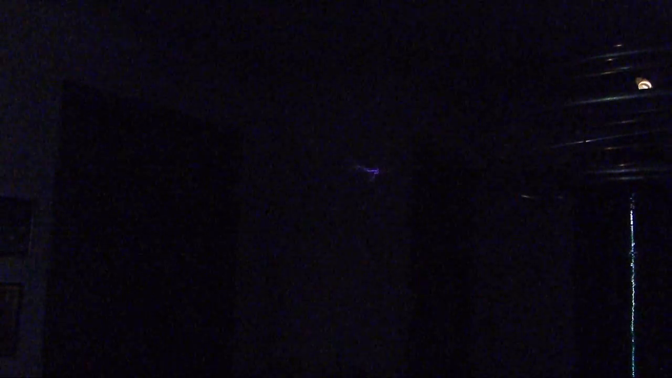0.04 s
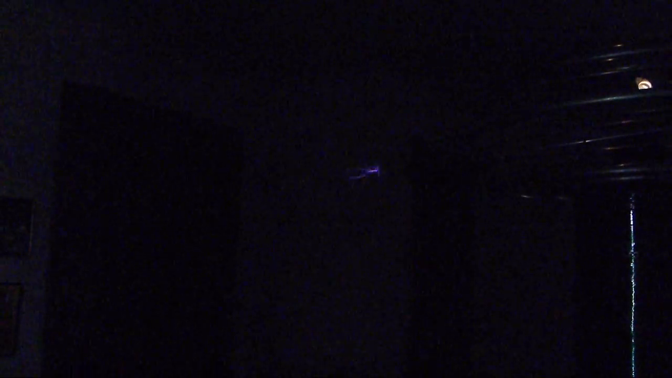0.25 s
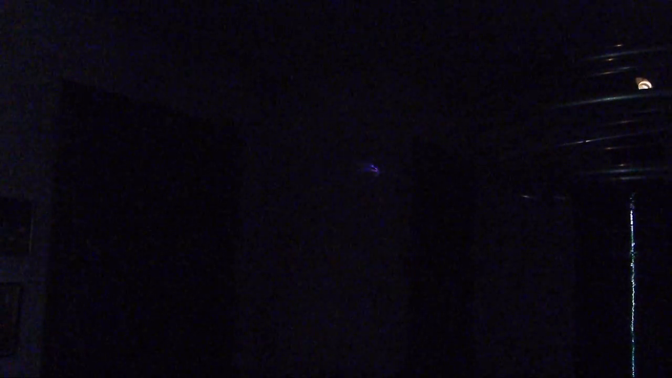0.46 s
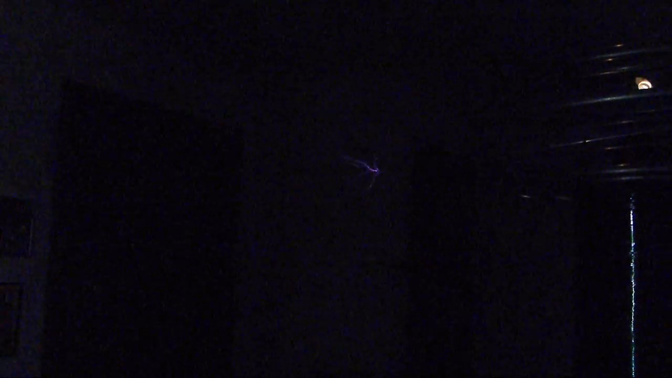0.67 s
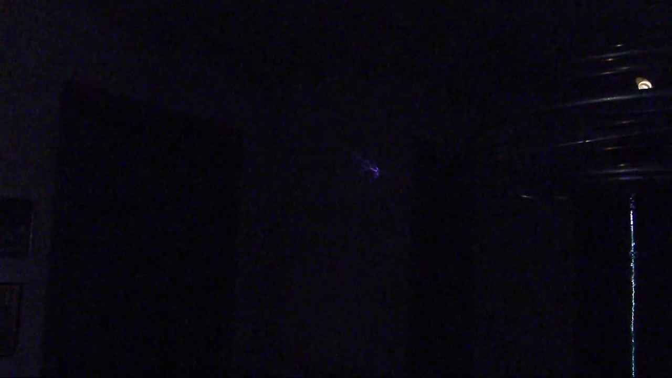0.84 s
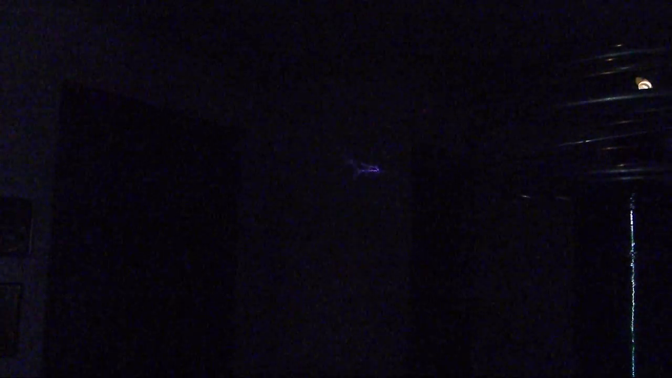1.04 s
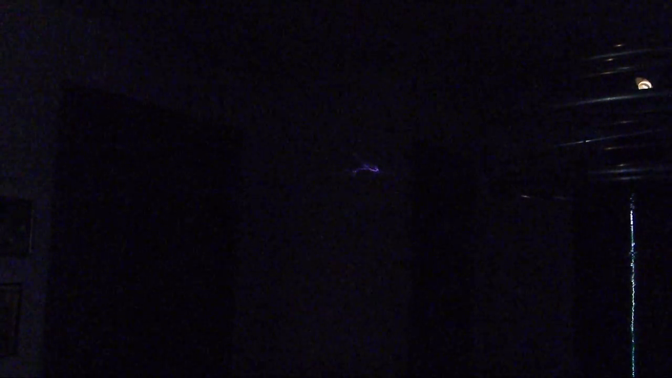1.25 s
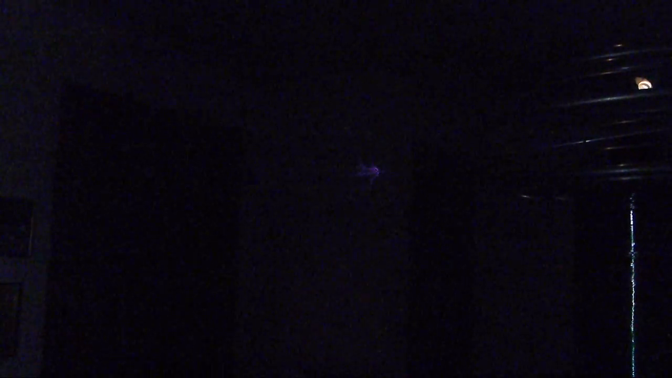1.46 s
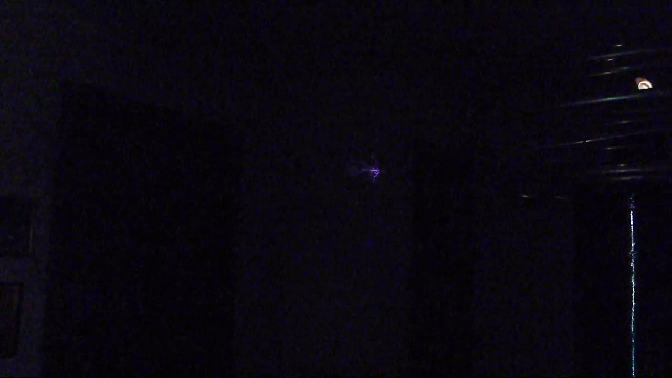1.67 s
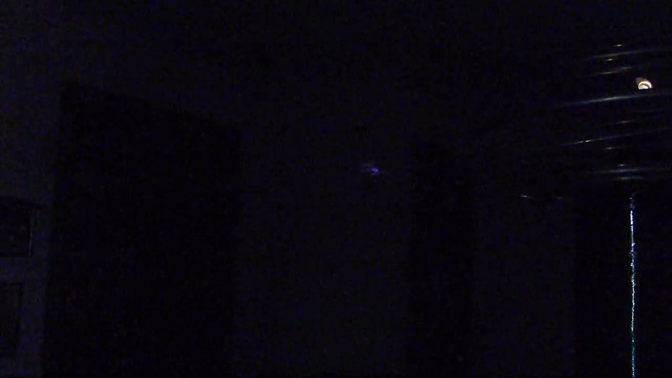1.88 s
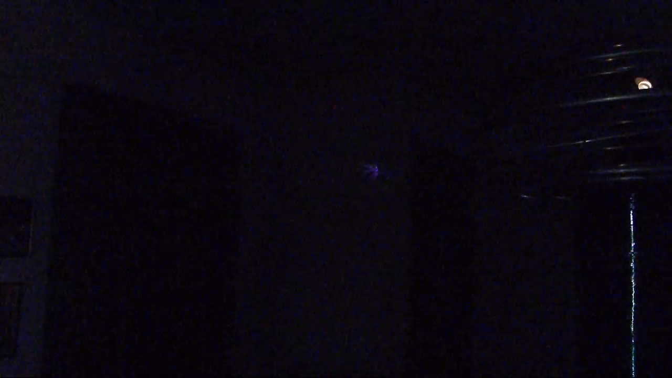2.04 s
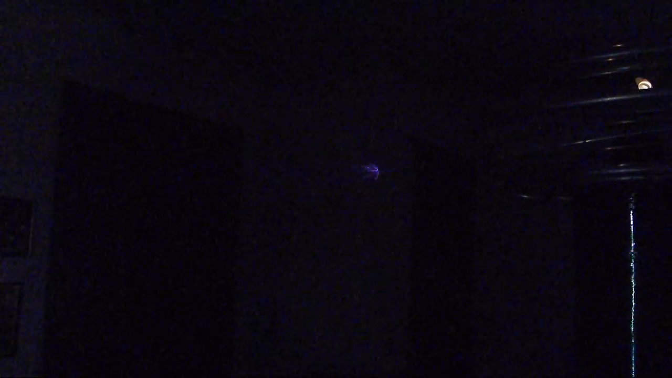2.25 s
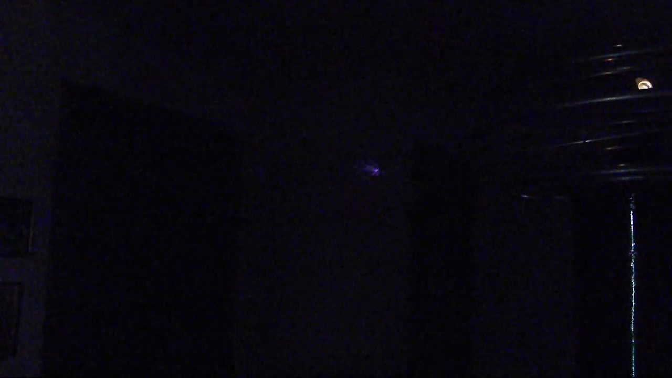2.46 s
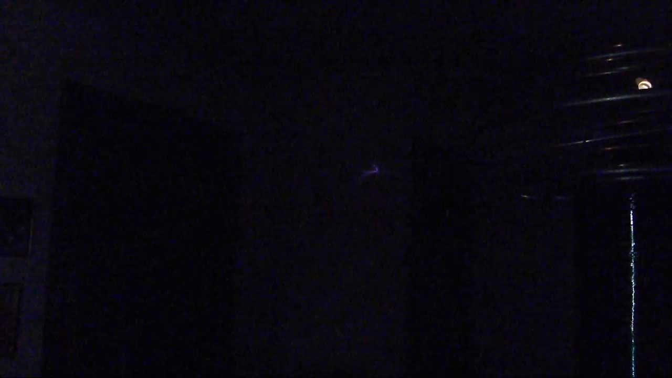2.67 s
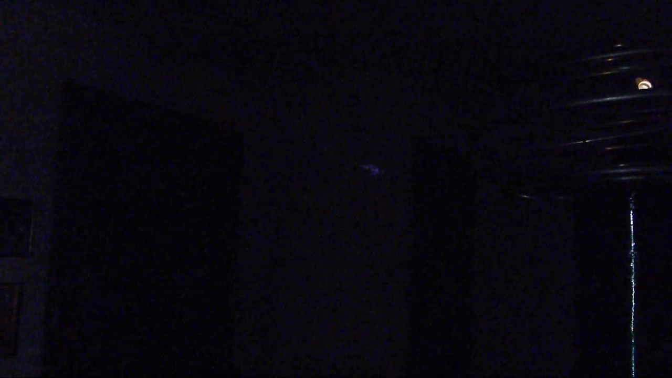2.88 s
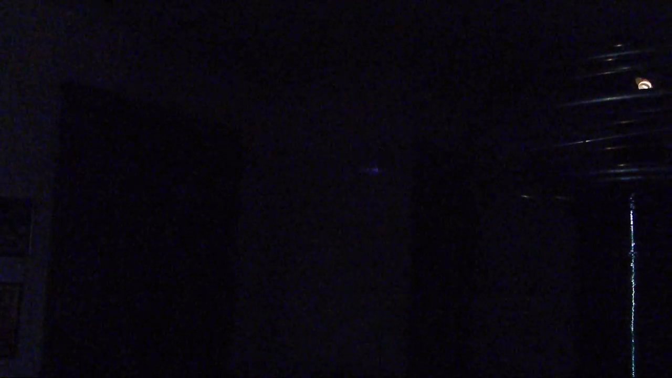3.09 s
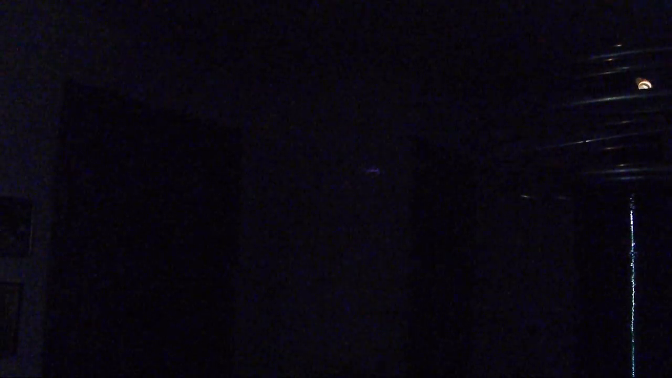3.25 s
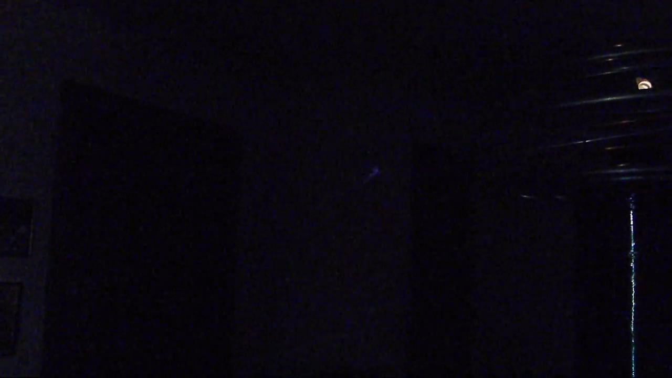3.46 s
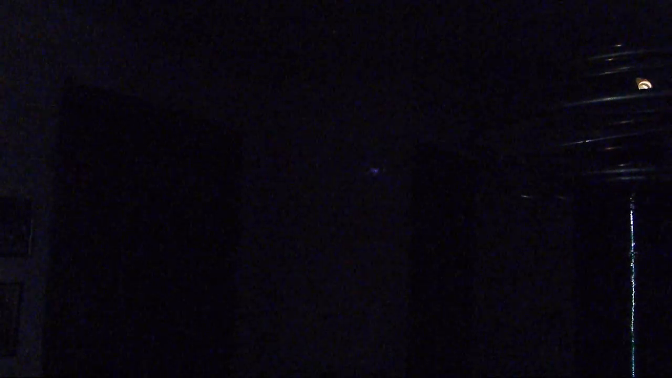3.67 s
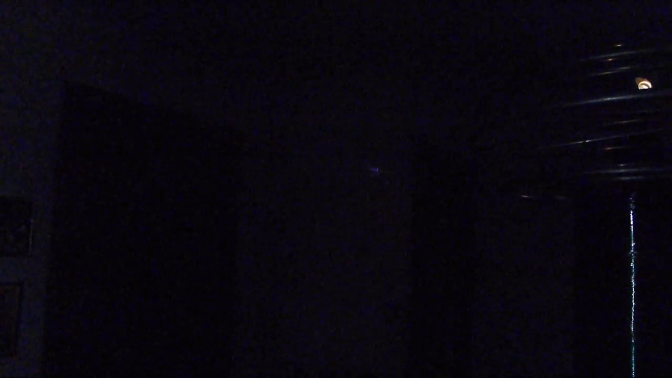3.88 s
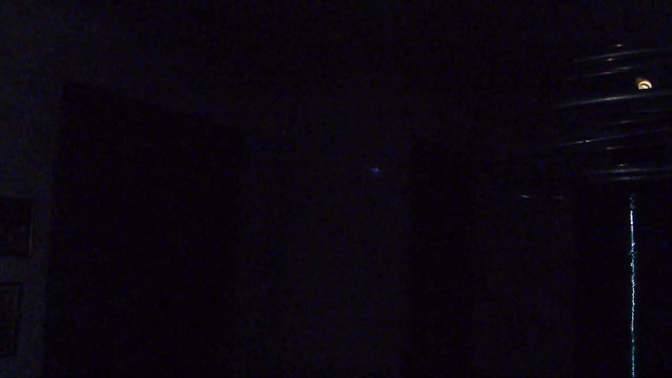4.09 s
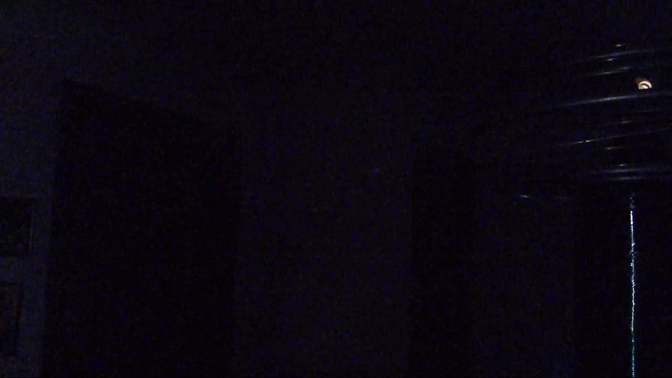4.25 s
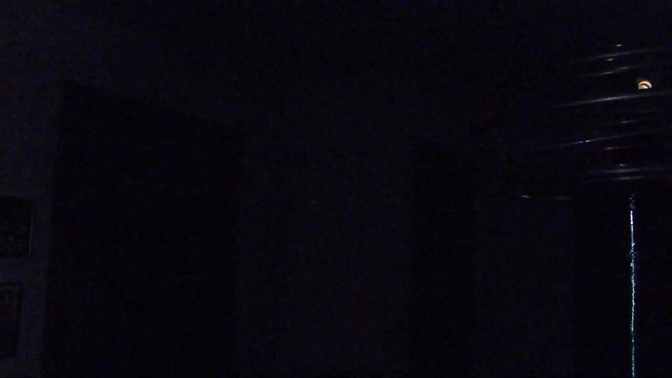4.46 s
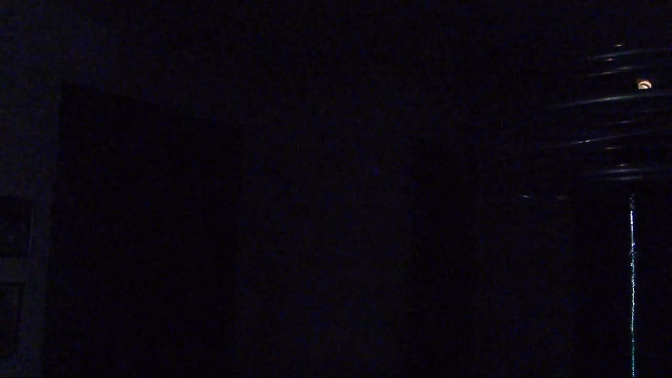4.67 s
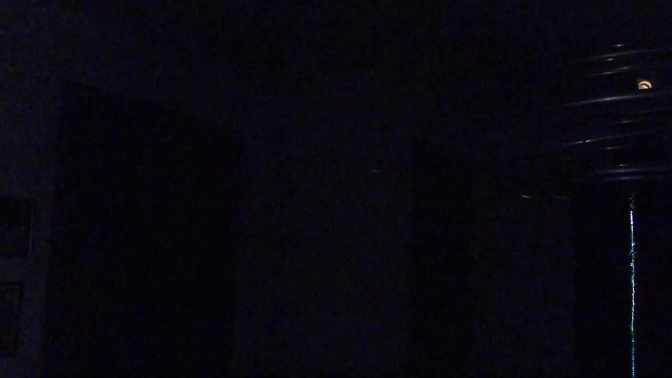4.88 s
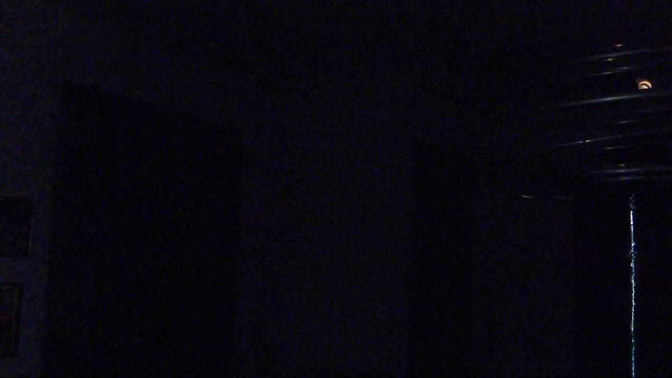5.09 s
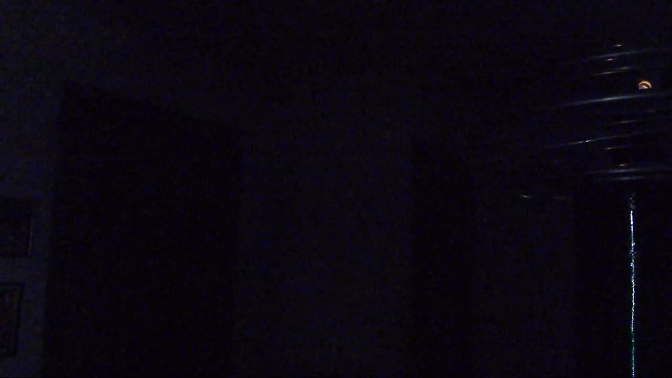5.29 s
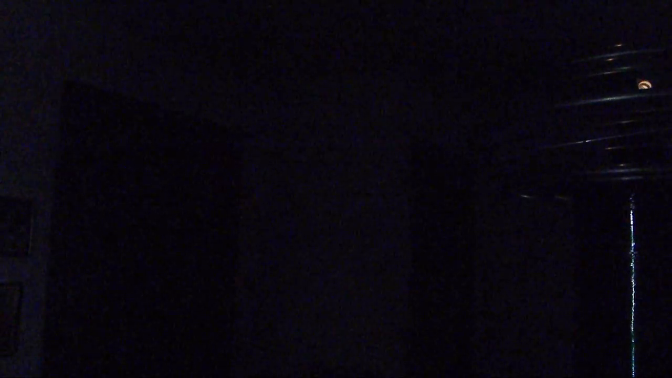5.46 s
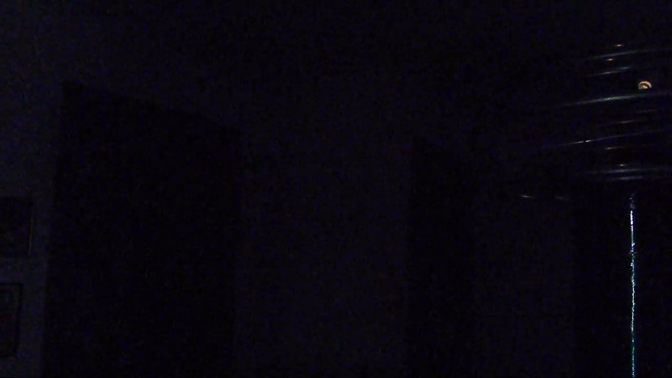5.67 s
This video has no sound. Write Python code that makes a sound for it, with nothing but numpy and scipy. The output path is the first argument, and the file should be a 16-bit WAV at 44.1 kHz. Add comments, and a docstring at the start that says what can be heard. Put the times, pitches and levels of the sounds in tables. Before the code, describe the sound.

From the start, a high-voltage coil fires sparks into the air of a small room, so rapidly that they merge into a harsh, raspy buzz of unchanging pitch. Crackle and a high fizz ride on it, with short wall reflections and slightly sharper cracks at about 0.4, 1.1, 2.1 and 2.7 seconds. Near 2.8 seconds the buzz becomes quieter and thinner. It swells back a little around 3.6 to 3.8 seconds with two more cracks, then falls away sharply just after 4 seconds. From about 5 seconds the dying arc only sputters, giving a string of weak, irregular spits until the end at roughly 5.7 seconds. As the arc fades, the spark gap's thin, rapid ticking and the coil's faint, very high whistle come forward, along with a low room hush carrying a slight electrical hum.

```python
"""A harsh, crackling buzz: a high-voltage coil throws about 69 sparks a second into a small room.
Each discharge heats the air into a bang whose exact repetition makes the buzz; branching streamers add
a crack and the corona a fizz, both new every time, and the spark gap a thin tick. The arc shrinks in
two steps until it only spits now and then, while the tick, the coil's resonant whistle and the
room's hush come forward."""
import sys
import numpy as np
from scipy import signal
from scipy.fft import rfft, irfft
from scipy.io import wavfile

SR = 44100
rng = np.random.default_rng(int(sys.argv[2]) if len(sys.argv) > 2 else 0)


def wrap_up_sound(samples):
    """Save the sound to the file named by the first command line argument, as 16-bit audio."""
    columns = np.atleast_2d(samples).T
    # keep every value between -1 and 1, then stretch to whole-number steps
    tamed = np.clip(columns, -1, 1)
    steps = np.round(tamed * 32767).astype(np.int16)
    wavfile.write(sys.argv[1], SR, steps)


N = 252693

FIRING_HZ, FIRST_FIRING_S = 68.65, .0114
CUTOFF_HZ = 15790
# sound paths, direct and by ceiling and walls: delay/ms, level/dB, extra treble level/dB
PATHS = [(0, 0, 0), (1.68, 0, 2), (2.07, -8, -8), (4.0, -4, -9), (5.64, -7, -10), (6.55, -2, -10),
         (9.58, -2, -8)]


def arc_bang(times, level_db, size_db, treble_db):
    """A shorter pulse has a wider spectrum: the repeating bang sharpens as the arc shrinks."""
    # spectrum of the bang's sharp edge: f/Hz, relative level/dB
    edge_spectrum = [(3850, 1), (4500, 5), (5200, -1), (5900, -20), (7500, -25), (11500, 1.5), (13000, -2),
                     (16000, -22)]
    sharp_db = np.minimum(treble_db - 0.41 * size_db, 6.5)
    sharp_db = np.interp(np.arange(N) / SR, times, sharp_db)
    drone = buzz(centre_hz=2010, diffuse_db=-1)
    drone = brightened(drone, 0.81 * sharp_db, edge_hz=3440)
    drone = from_db(7.5) * brightened(drone, 0.49 * sharp_db, edge_hz=1260)
    edge = from_db(sharp_db - 9) * click_train(edge_spectrum, lead_ms=0, diffuse_db=5)
    return held(times, level_db) * (drone + edge)


def buzz(centre_hz, diffuse_db):
    """Thermal expansion: the channel gives the same push and pull at each firing; walls repeat it."""
    # harmonics, some favoured by the room's standing waves: multiple of the firing rate, level/dB
    harmonics = [(1, -35), (2, -34), (3, -36), (4, -20), (5, -15), (6, -25), (7, -10), (8, -17), (9, -21),
                 (10, -10), (11, -13), (12, -16), (13, -8), (14, -17), (15, -13), (16, -11), (17, -18),
                 (18, -3), (19, -9), (20, -10), (21, -15), (22, -15), (23, -11), (24, -6), (25, -14),
                 (26, -6), (27, -5), (28, -7), (29, 0), (30, -9), (31, -16), (32, -12), (33, -6), (34, -19),
                 (35, -1), (36, -4), (37, -5), (38, -11), (39, -8), (40, -8), (41, -12), (42, -16),
                 (43, -14), (44, -7), (45, -9), (46, -12), (47, -17), (48, -15), (49, -15), (50, -18),
                 (51, -13), (52, -11), (53, -14), (54, -20), (55, -16), (56, -23)]
    multiples, db = np.transpose(harmonics)
    hz = multiples * FIRING_HZ
    s = 1j * hz / centre_hz
    pulse = s ** 2 / (1 + s + s ** 2) / (1 + s)
    arriving = pulse * path_sum(hz, 0, diffuse_db)
    return repeating(multiples, from_db(db) * arriving / np.abs(arriving))   # arrival sets phase only


def streamers(times, level_db, bright_db):
    """Random branching: new streamers at each firing give a broadband crack."""
    # spectrum of the crack: f/Hz, relative level/dB
    spectrum = [(100, -21), (500, -19), (1000, -10), (1700, -4.5), (2500, 3.5), (3500, 2), (4500, -0.5),
                (6000, -3.5), (9000, -8.5), (16000, -61)]
    bursts = crackle(times, level_db, length_s=.00018, treble_share=.3, diffuse_db=1.2, wander_s=.00006)
    lift_db = np.interp(np.arange(N) / SR, times, bright_db)
    return brightened(without_lead_in(coloured(bursts, spectrum)), lift_db, edge_hz=3500)


def corona(times, level_db):
    """Corona discharge at the tips: shorter, drier bursts that fizz high in the treble."""
    # spectrum of the fizz: f/Hz, relative level/dB
    spectrum = [(1000, -34), (5000, -35), (7000, -10.5), (9000, -6), (11000, -0.5), (12500, 2.5),
                (14000, 0.5), (16000, -6.5)]
    bursts = crackle(times, level_db, length_s=.00009, treble_share=1, diffuse_db=-5.5, wander_s=.00005)
    return without_lead_in(coloured(bursts, spectrum))


def spark_gap(times, size_db, lead_ms=1.9):
    """Electrical breakdown: the gap fires just ahead of the arc, a tick with a little sizzle."""
    # spectrum of tick and sizzle: f/Hz, relative level/dB
    spectrum = [(4000, -17), (6000, -14), (7200, -2.5), (8800, -0.5), (9300, -0.5), (9700, -3), (11300, 0),
                (13000, -3.5), (16000, -16.5)]
    times = times - lead_ms / 1000
    chance = clipped_normal(len(times))
    sizzle_db = 2.5 + 0.84 * size_db + chance
    sizzle = crackle(times, sizzle_db, length_s=.0002, treble_share=.62, diffuse_db=-.5, wander_s=.00005)
    tick = click_train(spectrum, lead_ms, diffuse_db=3.5)
    return held(times, 0.76 * chance) * (tick + without_lead_in(coloured(sizzle, spectrum)))


def coil_whistle(times, size_db, ring_hz=9200):
    """Resonance: the coil rings on one high harmonic of the firing rate."""
    # the whistle grows slightly louder as the arc shrinks
    return held(times, -8 - 0.14 * size_db) * repeating([ring_hz / FIRING_HZ], 1)


def crackle(times, level_db, length_s, treble_share, diffuse_db, wander_s):
    """Incoherent addition: each path sees the new branches from another side, as a burst of its own."""
    delay_ms, db, treble_db = np.transpose(PATHS)
    age = np.arange(96) / SR / length_s
    gains = from_db(db + treble_share * treble_db)
    out = 0
    for delay_s, gain in zip(delay_ms / 1000, gains / np.linalg.norm(gains)):
        bursts = rng.standard_normal((len(times), len(age))) * age * np.exp(-age)
        bursts *= (gain * from_db(level_db) / np.linalg.norm(bursts, axis=1))[:, None]
        onsets = times + delay_s - length_s + wander_s * rng.standard_normal(len(times))
        out = out + placed(onsets, bursts)
    wet = from_db(diffuse_db)
    return (out + wet * reverberation(out)) * np.sqrt(SR / FIRING_HZ / (1 + wet ** 2))


def click_train(spectrum, lead_ms, diffuse_db):
    """Periodicity: a thin click that repeats exactly has a line spectrum, rippled by its echoes."""
    multiples = np.arange(1, CUTOFF_HZ // FIRING_HZ)
    hz = multiples * FIRING_HZ
    points_hz, db = np.transpose(spectrum)
    arriving = path_sum(hz, 1, diffuse_db) * np.exp(2j * np.pi * hz * lead_ms / 1000)
    colour = from_db(np.interp(np.log(hz), np.log(points_hz), db)) * (hz > points_hz[0])
    return repeating(multiples, colour * arriving / np.abs(arriving) ** 0.46)   # softened ripple


def path_sum(hz, treble_share, diffuse_db):
    """Interference: the delayed paths and a diffuse field of random phase add as complex amplitudes."""
    delay_ms, db, treble_db = np.transpose(PATHS)
    turns = np.outer(hz, delay_ms) / 1000
    paths = np.exp(-2j * np.pi * turns) @ from_db(db + treble_share * treble_db)
    scattered = np.exp(2j * np.pi * rng.random(len(hz)))
    return paths + from_db(diffuse_db) * scattered


def reverberation(x, t60_s=0.36):
    """Diffuse decay: noise follows the source's energy as it fades exponentially in the room."""
    keep = from_db(-120 / (t60_s * SR))
    energy = signal.lfilter([1 - keep], [1, -keep], x ** 2 + 1e-18)
    return np.sqrt(energy) * rng.standard_normal(len(x))


def room_hush(noise_db, hum_db):
    """Ambient noise: a low hush with a faint mains hum in it."""
    # spectrum of the room noise: f/Hz, relative level/dB
    spectrum = [(20, -3), (60, -3), (130, -0.5), (220, -5), (600, -7), (3000, -41), (16000, -55)]
    hum = np.sqrt(2) * np.sin(2 * np.pi * 120 * np.arange(N) / SR)
    return from_db(noise_db) * (coloured(rng.standard_normal(N), spectrum) + from_db(hum_db) * hum)


def form_at(times, settle_s=0.045):
    """Exponential relaxation: the arc settles into each new form over a few firings."""
    # harsh bright streamers, long duller ones, a short even brush, sputtering:
    # start t/s, bang treble/dB, crack level/dB, crack brightness/dB, fizz level/dB, fizz spread/dB
    forms = [(0, 0, -31.5, 2.5, -32, 1), (0.43, -2.5, -33, -3.5, -35, 1.6),
             (2.79, 1.54, -36.5, -1.5, -33, 1), (5.02, 1.2, -27.5, -2.5, -41, 3.5)]
    start, *columns = np.transpose(forms)
    steps = np.array(columns)[:, np.searchsorted(start[1:], times)]
    keep = np.exp(-1 / (settle_s * FIRING_HZ))
    return signal.lfilter([1 - keep], [1, -keep], steps - steps[:, :1]) + steps[:, :1]


def boost(times, rows):
    """Rectangular pulses of level/dB over the firings, from rows of t/s, firing count, level/dB."""
    out = np.zeros(len(times))
    for s, count, db in rows:
        first = np.argmin(np.abs(times - s))
        out[first:first + int(round(count))] = db
    return out


def clipped_normal(count):
    """Gaussian scatter, limited to two standard deviations."""
    return np.clip(rng.standard_normal(count), -2, 2)


def uneven(shared, correlation=0.46):
    """Partial correlation: a layer's scatter is partly shared and partly its own."""
    return correlation * shared + np.sqrt(1 - correlation ** 2) * clipped_normal(len(shared))


def held(times, db):
    """Amplitude envelope: the gain reaches each firing's level mid-cycle, as its echoes arrive."""
    return np.interp(np.arange(N) / SR, times + 0.52 / FIRING_HZ, from_db(db))


def repeating(multiples, amplitudes, size=8192):
    """Fourier synthesis: one cycle of complex harmonics, repeated at the firing rate; rms 1."""
    lines = np.zeros(size // 2 + 1, complex)
    lines[np.round(multiples).astype(int)] = amplitudes
    cycles = (np.arange(N) / SR - FIRST_FIRING_S) * FIRING_HZ
    return rms_one(np.interp(cycles % 1 * size, np.arange(size), irfft(lines)))


def coloured(x, spectrum, size=2048):
    """Minimum-phase filtering to the given spectrum; white noise keeps its power."""
    hz, db = np.transpose(spectrum)
    grid = np.maximum(np.arange(size // 2 + 1) * SR / size, 1)
    gain = rms_one(from_db(np.interp(np.log(grid), np.log(hz), db)))
    cepstrum = irfft(np.log(gain))
    cepstrum[1:size // 2] *= 2
    cepstrum[size // 2 + 1:] = 0
    return signal.fftconvolve(x, irfft(np.exp(rfft(cepstrum))))[:len(x)]


def brightened(x, gain_db, edge_hz):
    """Shelving: raise or lower the part of a sound above the edge."""
    low = signal.sosfiltfilt(signal.butter(4, edge_hz, fs=SR, output="sos"), x)
    return low + from_db(gain_db) * (x - low)


def placed(times, shapes):
    """Superposition of one short shape (a row) at each time, with a half-second lead-in."""
    out = np.zeros(N + SR)
    samples = np.round(times * SR).astype(int)[:, None] + np.arange(shapes.shape[1])
    np.add.at(out, samples, shapes)
    return np.roll(out, SR // 2)


def without_lead_in(x):
    """Time window: the N samples from t = 0."""
    return x[SR // 2:SR // 2 + N]


def at_time(rows, s):
    """Linear interpolation of a curve's columns at the given times."""
    when, *columns = np.transpose(rows)
    return [np.interp(s, when, column) for column in columns]


def from_db(db):
    """Amplitude ratio of a level."""
    return 10 ** (np.asarray(db) / 20)


def rms_one(x):
    """Normalisation to unit power."""
    return x / np.sqrt(np.mean(x ** 2) + 1e-20)


def scene():
    """Superposition: arc, gap and coil share one firing clock, above the hush of the room."""
    # size of the arc, expressed as a level: t/s, level/dB
    arc = [(0.0, -32.5), (0.03, -33.5), (0.51, -36), (0.54, -32.5), (0.73, -33.5), (1.23, -31.5),
           (1.43, -32.5), (1.54, -31.5), (1.75, -33.5), (2.15, -32.5), (2.75, -33.5), (2.92, -38),
           (3.81, -34.5), (4.05, -38), (4.25, -44.5), (4.52, -42.5), (5.06, -48), (5.07, -51.5)]
    # discharges that flare: t/s, change of crack and fizz level/dB
    flares = [(0.172, 2), (0.244, 1), (0.419, 5.5), (0.696, 1), (1.133, 4.5), (1.657, -4), (2.138, 4),
              (2.342, 3), (2.357, 1), (2.4, 3), (2.663, 5.5), (2.794, 3.5), (3.58, 5.5), (3.755, 4.5)]
    # the dying arc catches for a moment: t/s, firing count, change of bang and crack level/dB
    spits = [(5.095, 1, 5.5), (5.153, 1, 3.7), (5.197, 1, 4), (5.285, 4, 4.5), (5.401, 1, 5.5),
             (5.503, 1, -1), (5.576, 1, 7), (5.605, 1, 2.5), (5.692, 2, 5)]
    # steady sounds come forward as the arc dies: t/s, gap and coil gain/dB, room noise level/dB
    background = [(0, -45, -72), (2.7, -41.5, -68.5), (4.2, -40, -63), (5.73, -38, -58.5)]
    full_arc_db = -34
    # a few firings precede the start
    times = FIRST_FIRING_S + np.arange(-20, int(N / SR * FIRING_HZ) + 1) / FIRING_HZ
    size_db = at_time(arc, times)[0] - full_arc_db
    treble_db, crack_db, bright_db, fizz_db, fizz_spread_db = form_at(times)
    coil_db, hush_db = at_time(background, np.arange(N) / SR)
    flare_db = boost(times, [(s, 1, db) for s, db in flares])
    spit_db = boost(times, spits)
    # no two ordinary discharges are equally strong
    ordinary = flare_db + spit_db == 0
    shared = clipped_normal(len(times)) * ordinary
    bang = arc_bang(times, full_arc_db + size_db + spit_db + 0.34 * shared, size_db, treble_db)
    crack_scatter_db = 1.3 * uneven(shared) * ordinary
    crack = streamers(times, crack_db + 1.24 * size_db + flare_db + spit_db + crack_scatter_db, bright_db)
    fizz_scatter_db = fizz_spread_db * uneven(shared) * ordinary
    fizz = corona(times, fizz_db + size_db + flare_db + fizz_scatter_db)
    coil = spark_gap(times, size_db) + coil_whistle(times, size_db)
    return (bang + crack + fizz + from_db(coil_db) * coil + room_hush(hush_db, hum_db=-7.5))[None]


def record(dry):
    """Antiresonance: the microphone port cuts four hollows; a steep low-pass removes the top."""
    # hollows of the port: f/Hz, width/Hz, depth/dB
    hollows = [(4080, 250, 13), (6260, 900, 13), (7850, 500, 13), (10170, 600, 16)]
    for hz, width_hz, depth_db in hollows:
        b, a = signal.iirpeak(hz, hz / width_hz, fs=SR)
        dry = dry - (1 - from_db(-depth_db)) * signal.lfilter(b, a, dry)
    return signal.sosfilt(signal.ellip(16, .1, 80, CUTOFF_HZ, fs=SR, output="sos"), dry)


dry = scene()
out = record(dry)
wrap_up_sound(out)
```